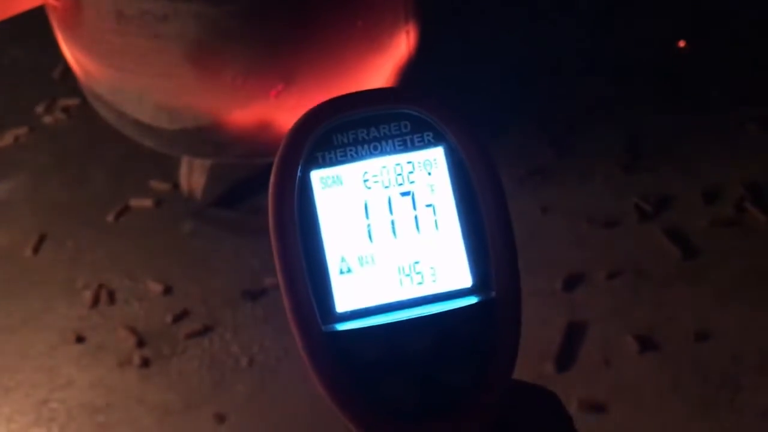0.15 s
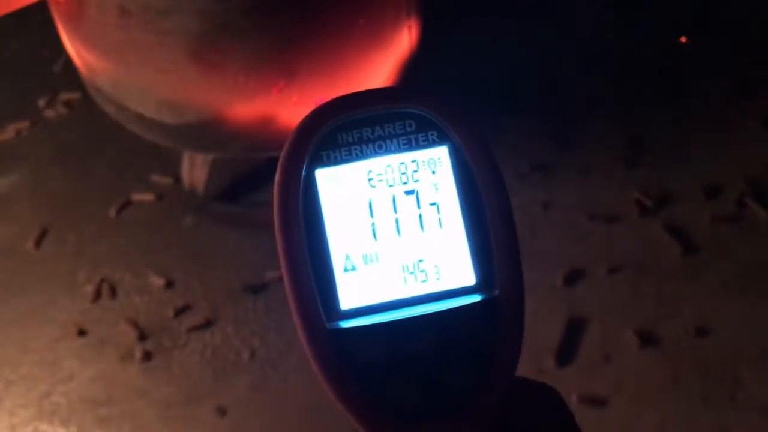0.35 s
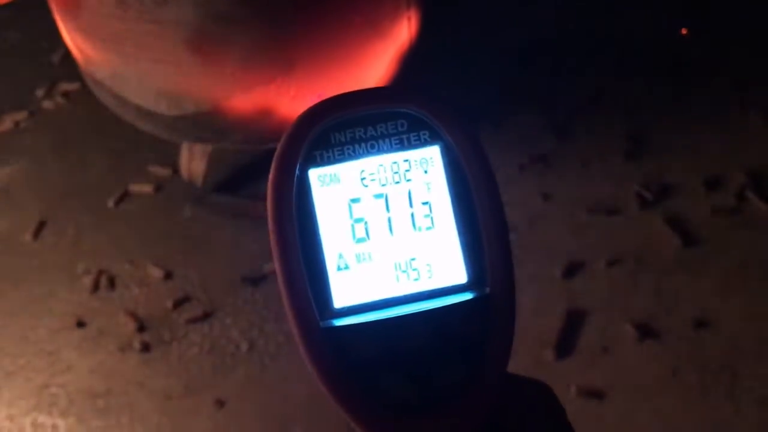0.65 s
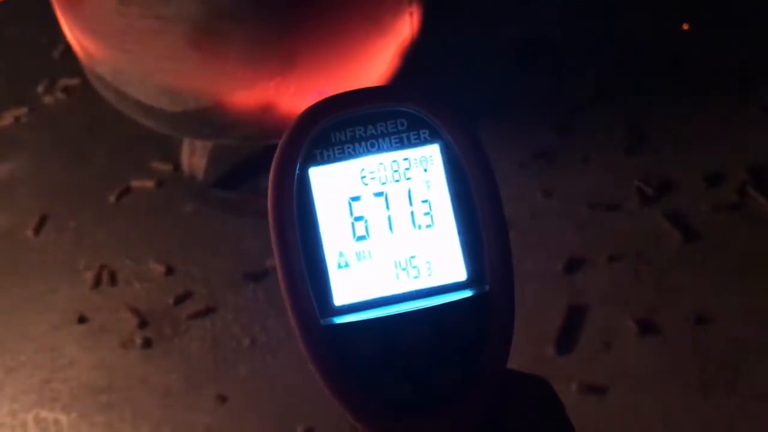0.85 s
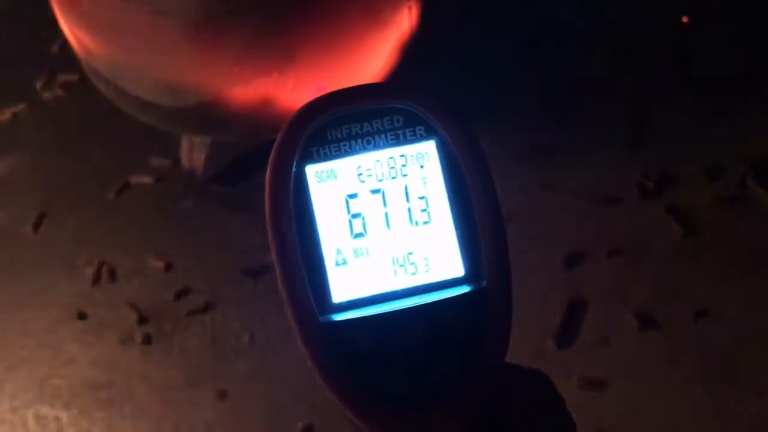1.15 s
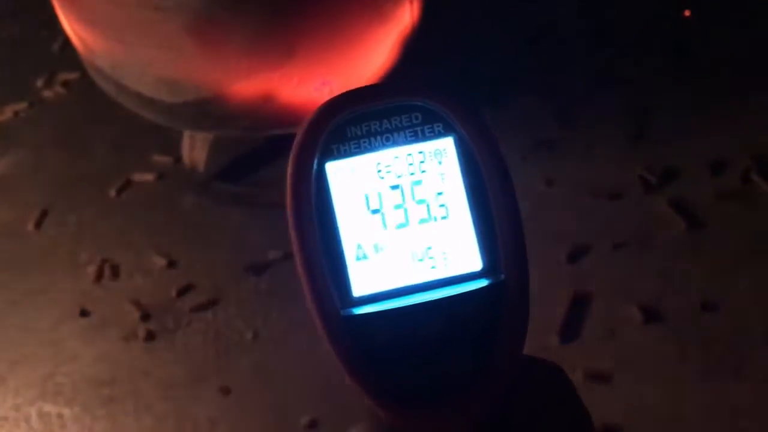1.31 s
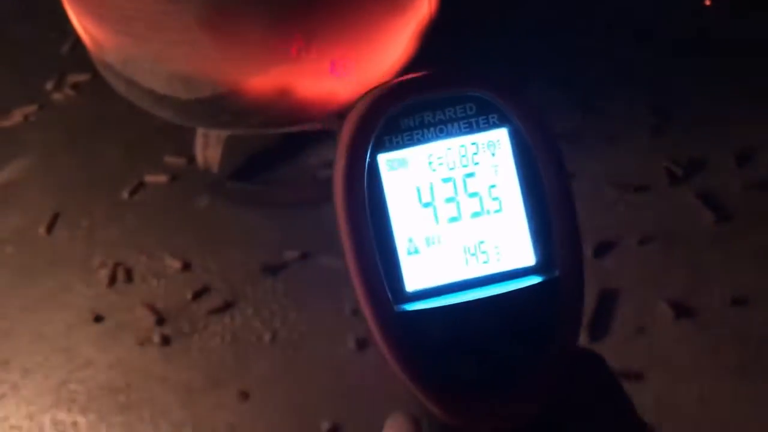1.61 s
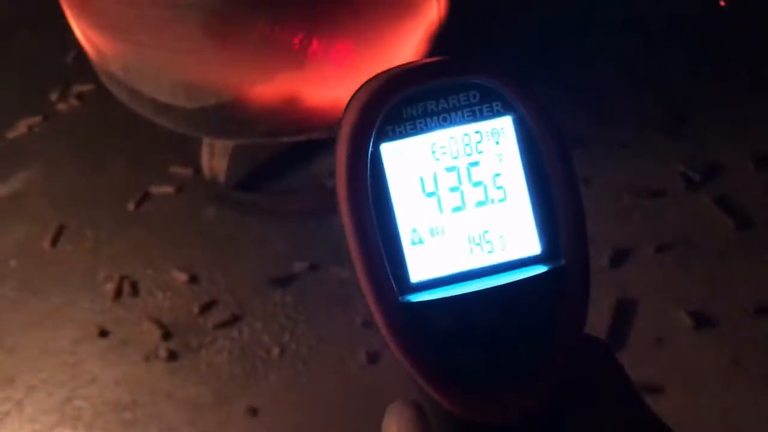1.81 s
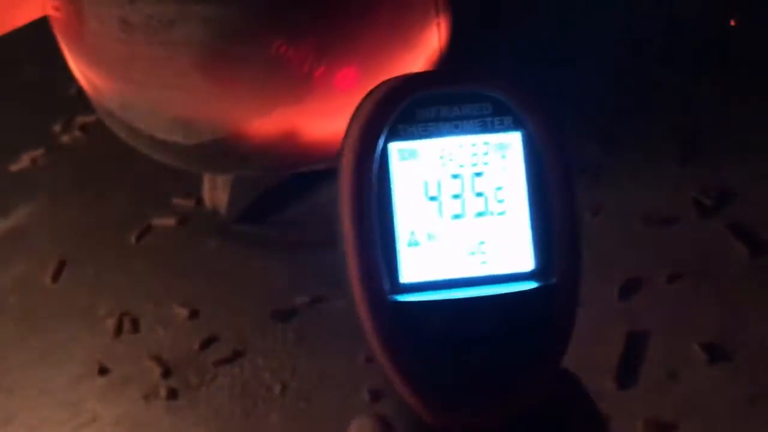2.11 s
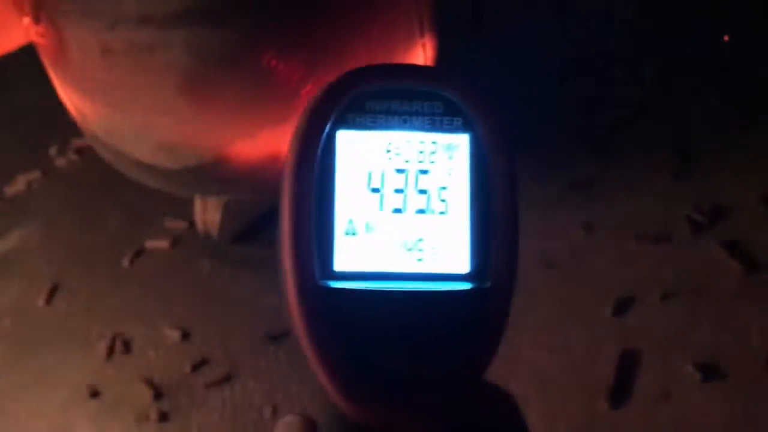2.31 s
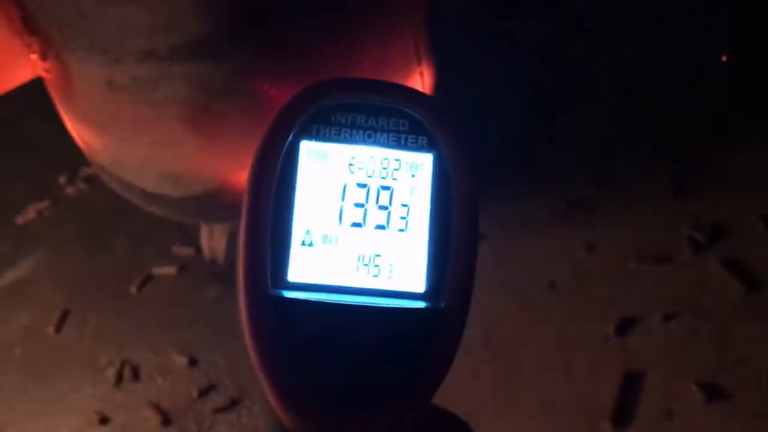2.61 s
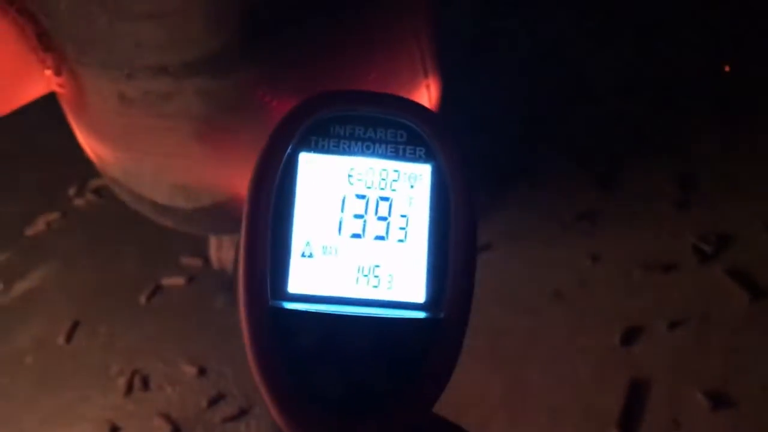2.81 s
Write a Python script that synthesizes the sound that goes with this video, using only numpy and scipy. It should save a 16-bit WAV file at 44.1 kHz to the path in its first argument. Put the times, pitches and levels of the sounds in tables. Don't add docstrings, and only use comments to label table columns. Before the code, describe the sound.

A forced-air burner roars continuously under a glowing pot, close to a small microphone. Deep, turbulent flame rumble starts slightly weaker, fills out by 0.8 s and holds, with irregular soft low puffs, strongest near 1.0 s. Over it runs a flickering mid-range air roar, light hiss and a barely audible high blower whine. A faint pop at 0.8 s, a sharper one at 2.2 s; slight easing at the end.

```python
import sys
import numpy as np
from scipy import signal
from scipy.fft import rfft, irfft
from scipy.io import wavfile
from scipy.ndimage import uniform_filter1d

SR = 44100
rng = np.random.default_rng(int(sys.argv[2]) if len(sys.argv) > 2 else 0)


def transcribe(u):
    v = np.clip(np.atleast_2d(u).T, -1, 1)
    q = np.round(v * 32767).astype(np.int16)
    wavfile.write(sys.argv[1], SR, q)


def natural_amplitude(level_db):
    exponent = np.asarray(level_db, float) / 20
    return 10 ** exponent


N = 130095

# time_s, rumble_level_db
FLAME_SURGE = [
    (0.0, -19),
    (0.34, -17.5),
    (2.48, -17.5),
    (2.95, -18.5),
]
# time_s, gain_db
DEEP_RUMBLE = [
    (0, -2),
    (.3, -6),
    (.8, -0.5),
    (2.95, -0.5),
]
# freq_hz, density_db_per_hz
RUMBLE_COLOUR = [(12, -49), (20, -27), (56, -1.5), (91, 1), (172, -4.5), (276, -17.5), (343, -21),
                 (379, -27), (420, -24), (550, -32), (920, -120)]
# centre_hz, width_hz, gain_db
REFLECTIONS = [(1500, 160, -4.5), (3470, 290, -2.5), (7600, 220, -3.5), (10470, 400, -4), (754, 41, -1),
               (392.5, 20, -2), (468, 9.2, -4), (511, 10, 3), (1212, 23, 3.5), (1246, 14, -0.5),
               (1299, 16, 5), (5500, 93, -1.5), (4250, 60, -1.5), (4860, 130, -1.5)]
# time_s, roar_level_db
AIR_FLOW = [
    (0.0, -25),
    (0.31, -25),
    (0.4, -26.5),
    (0.42, -25),
    (2.23, -24.5),
    (2.95, -26),
]
# freq_hz, density_db_per_hz
ROAR_COLOUR = [(220, -35), (380, -8.5), (573, -6.5), (652, -2), (928, 1), (1260, -3.5), (1570, -9),
               (1960, -10), (2600, -22.5), (3380, -52), (5720, -120)]
# freq_hz, density_db_per_hz
HISS_COLOUR = [(2300, -28), (2600, -8.5), (2950, 1), (4500, -3.5), (5000, -6), (7000, -8.5), (9500, -10.5),
               (16500, -22)]
# start_s, level_db
FLAME_POPS = [
    (2.204, -21),
    (.78, -31),
]
# time_s, pitch_hz
SLOT_TONE = [(0, 4248), (1.1, 4251), (1.8, 4258), (2.95, 4259)]
# slot_multiple, mains_sideband, start_level_db, end_level_db
MOTOR_WHINE = [(1, -3, -61, -62), (1, -2, -57, -58), (1, -1, -54, -52), (1, 0, -56, -54), (1, 1, -54, -57),
               (1, 2, -61, -60), (1, 3, -58, -57), (2, -1, -62, -69), (2, 0, -64, -58), (2, 1, -68, -67),
               (3, 0, -68, -61), (3, 1, -78, -74)]
# centre_s, peak_db, pitch_hz
GAS_PUFFS = [(0.109, -12, 123), (.39, -14, 76), (.43, -15.5, 110), (.72, -14, 88), (1.03, -10, 80),
             (1.42, -12.5, 80), (1.62, -14.5, 89.5), (1.98, -14, 67), (2.45, -14.5, 71), (2.53, -14.5, 84),
             (2.69, -14.5, 109), (2.80, -14.5, 108)]

MAINS_HZ = 120


def evened(x):
    return x / np.sqrt(np.mean(x ** 2) + 1e-20)


def along(points):
    time_s, value = np.transpose(points)
    return np.interp(np.arange(N) / SR, time_s, value)


def drift(lo_hz, hi_hz):
    hz = np.fft.rfftfreq(N, 1 / SR)
    shape = hz / (hz + lo_hz) / np.sqrt(hz + lo_hz) / (1 + (hz / hi_hz) ** 4)
    return evened(irfft(rfft(rng.standard_normal(N)) * shape, N))


def turbulence(colour, patchy_db, size):
    hop = size // 4
    hz = np.fft.rfftfreq(size, 1 / SR)
    real, imag, patches = rng.standard_normal((N // hop + 6, len(hz), 3)).T
    patches = uniform_filter1d(patches, size=size // 64, axis=0)
    patches = evened(uniform_filter1d(patches, size=5120 // size, axis=1))

    freq_hz, density_db = np.transpose(colour)
    level_db = np.interp(np.log(hz + 1), np.log(freq_hz + 1), density_db, left=-90, right=-90)
    for centre_hz, width_hz, gain_db in REFLECTIONS:
        level_db = level_db + gain_db * np.exp(-.5 * ((hz - centre_hz) / width_hz) ** 2)

    spectra = (real + 1j * imag) * natural_amplitude(level_db[:, None] + patchy_db * patches)
    noise = signal.istft(spectra, nperseg=size, noverlap=size - hop)[1]
    return evened(noise[:N])


def flame():
    deep_hz, steadiness = 74, 0.47
    rumble = turbulence(RUMBLE_COLOUR, patchy_db=0.1, size=4096)
    lowpass = signal.butter(4, deep_hz, fs=SR, output="sos")
    deep = signal.sosfiltfilt(lowpass, rumble)
    rumble = rumble + (natural_amplitude(along(DEEP_RUMBLE)) - 1) * deep

    lumps = uniform_filter1d(rumble ** 2, size=1800)
    lumps = uniform_filter1d(lumps, size=1800) + .02
    return natural_amplitude(along(FLAME_SURGE)) * evened(rumble / lumps ** (steadiness / 2))


def jet():
    hiss_db, hum_depth, pop_decay_s = -12, .05, 0.0052
    t = np.arange(N) / SR
    flow_db = along(AIR_FLOW)
    flicker = drift(lo_hz=20., hi_hz=80.)
    hiss_flicker = drift(lo_hz=12., hi_hz=60.)

    pops = sum(natural_amplitude(level_db) * (t > start_s) * np.exp(-abs(t - start_s) / pop_decay_s)
               for start_s, level_db in FLAME_POPS)
    roar_gain = natural_amplitude(flow_db - 0.33 + 1.28 * flicker) + pops
    roar = roar_gain * turbulence(ROAR_COLOUR, patchy_db=0.75, size=2048)

    buzz = 1 + hum_depth * np.sin(2 * np.pi * MAINS_HZ * t)
    hiss_gain = natural_amplitude(flow_db + hiss_db + 0.59 * flicker + 0.41 * hiss_flicker) * buzz
    hiss = hiss_gain * turbulence(HISS_COLOUR, patchy_db=0.7, size=512)
    return roar + hiss


def blower():
    waver_db, wobble_hz = 2., .5
    t = np.arange(N) / SR
    slot_hz = along(SLOT_TONE) + wobble_hz * drift(lo_hz=0.86, hi_hz=12.0)
    slot_cycles = np.cumsum(slot_hz) / SR
    whine = np.zeros(N)
    for multiple, sideband, start_db, end_db in MOTOR_WHINE:
        level_db = np.linspace(start_db, end_db, N) + waver_db * drift(lo_hz=0.32, hi_hz=2.2)
        cycles = multiple * slot_cycles + sideband * MAINS_HZ * t + rng.random()
        whine += np.sqrt(2) * natural_amplitude(level_db) * np.sin(2 * np.pi * cycles)
    return whine


def puffs():
    spread_s = .016
    t = np.arange(N) / SR
    booms = np.zeros(N)
    for centre_s, peak_db, pitch_hz in GAS_PUFFS:
        swell = np.exp(-.5 * ((t - centre_s) / spread_s) ** 2)
        booms += natural_amplitude(peak_db) * swell * np.cos(2 * np.pi * pitch_hz * (t - centre_s))
    return booms


def scene():
    return (flame() + jet() + blower() + puffs())[None]


def top_cut(x):
    return signal.sosfilt(signal.butter(12, 15700, fs=SR, output="sos"), x)


def record(dry):
    mic_low_hz = 38.4
    highpass = signal.butter(4, mic_low_hz, "highpass", fs=SR, output="sos")
    cut = signal.sosfilt(highpass, dry)
    mix = np.tanh(cut / 2.453) * 2.548
    return top_cut(mix)


dry = scene()
out = record(dry)
transcribe(out)
```